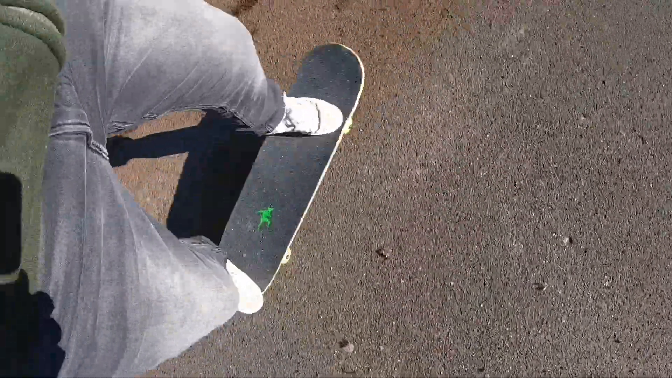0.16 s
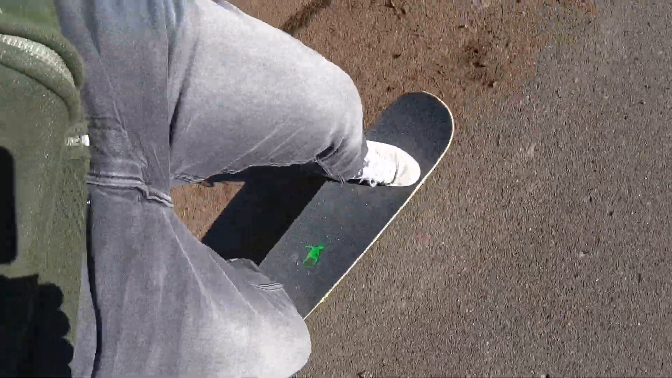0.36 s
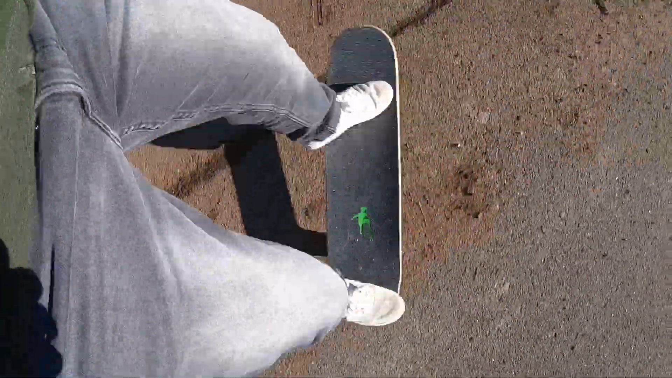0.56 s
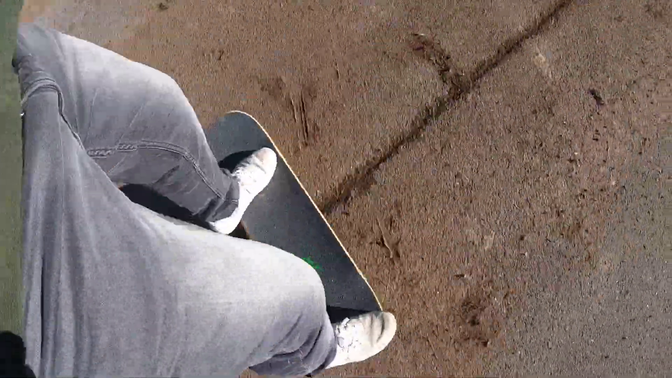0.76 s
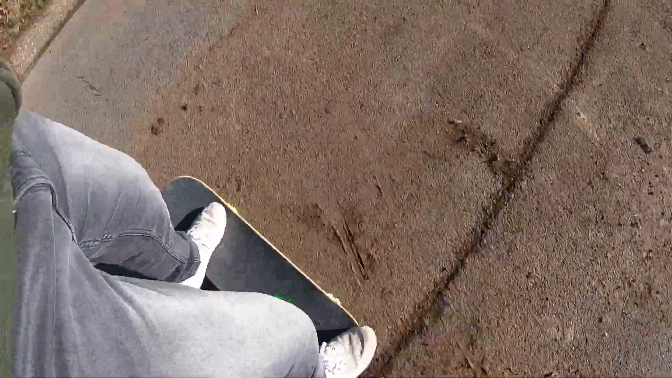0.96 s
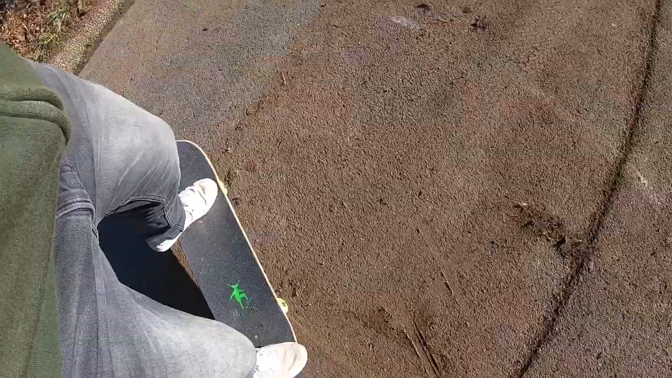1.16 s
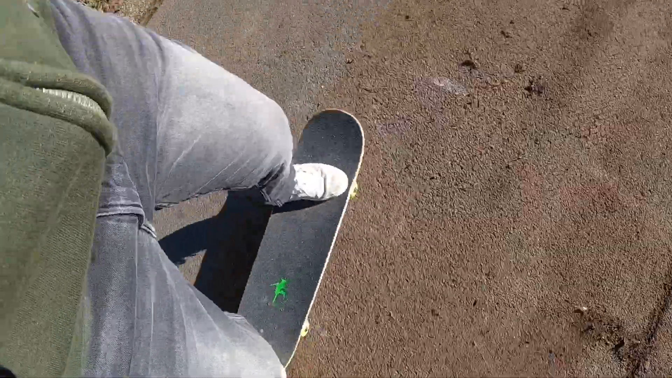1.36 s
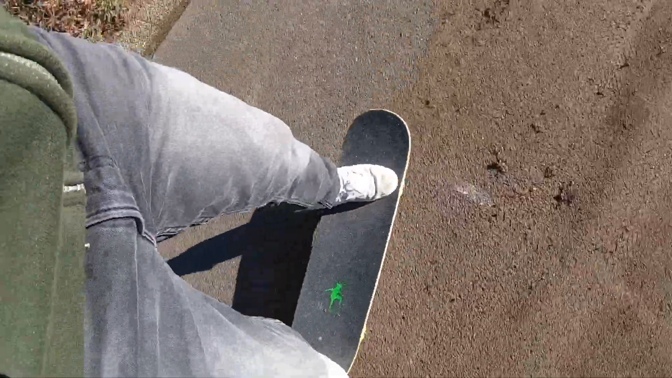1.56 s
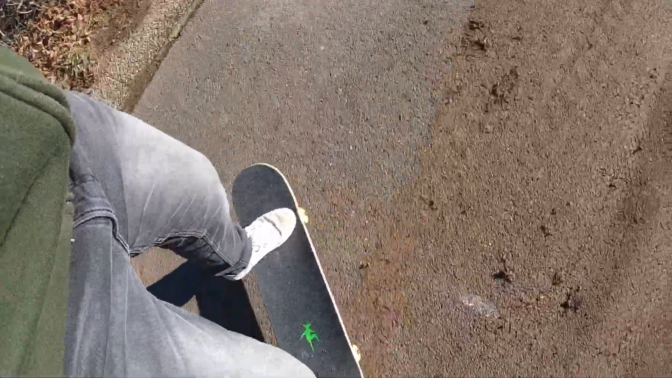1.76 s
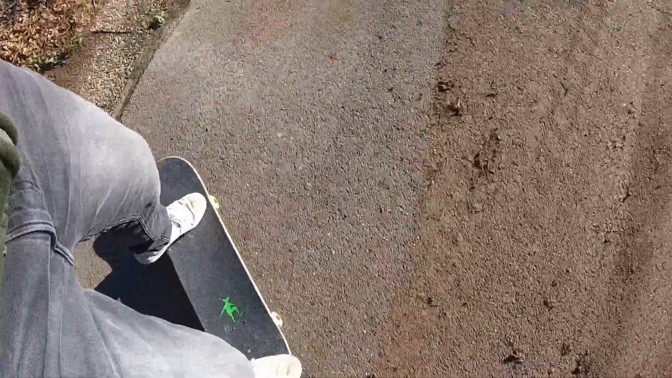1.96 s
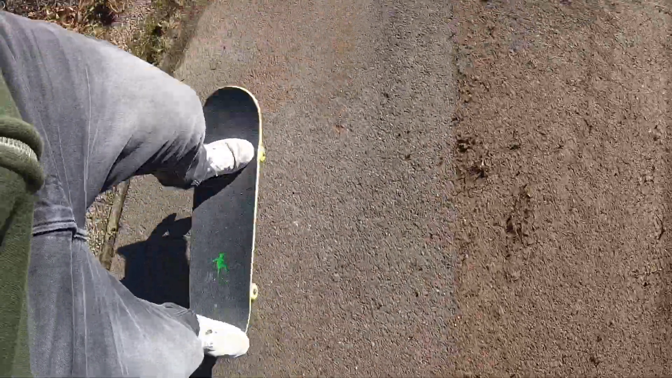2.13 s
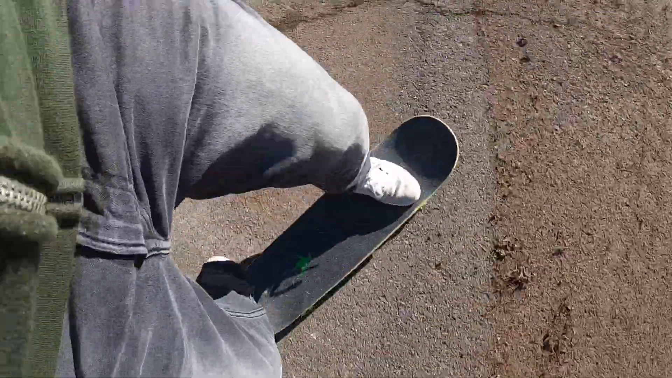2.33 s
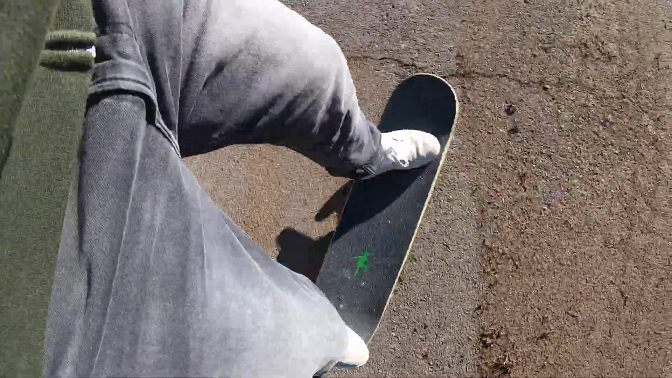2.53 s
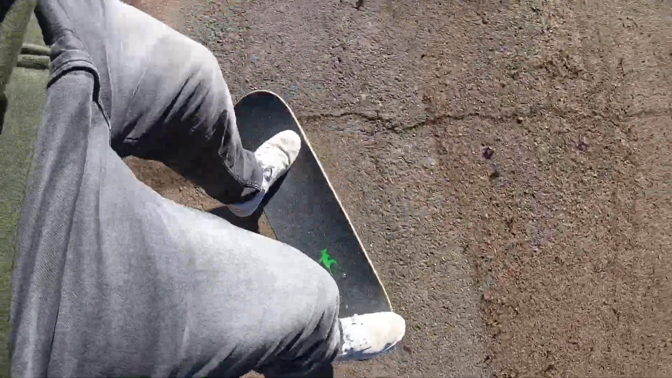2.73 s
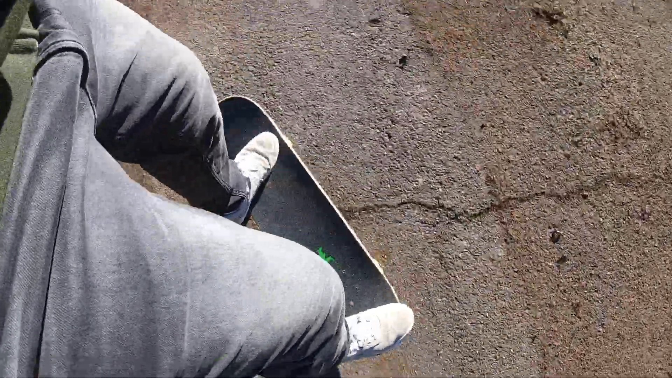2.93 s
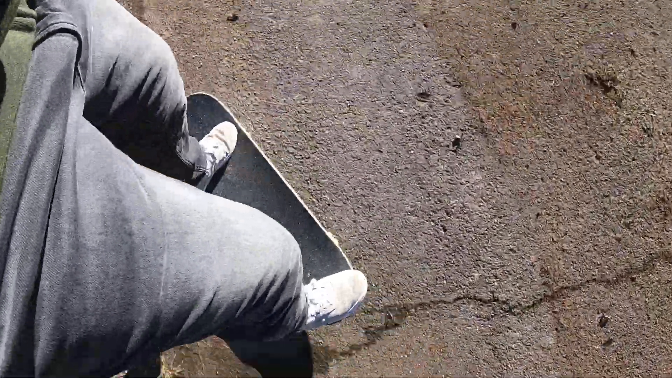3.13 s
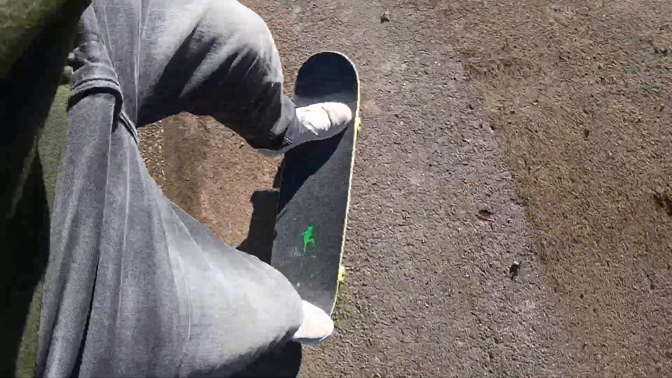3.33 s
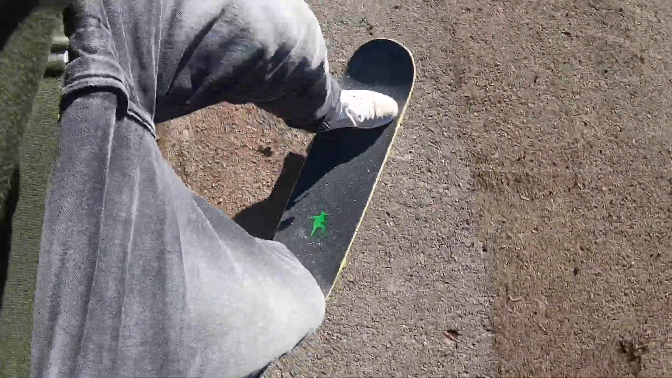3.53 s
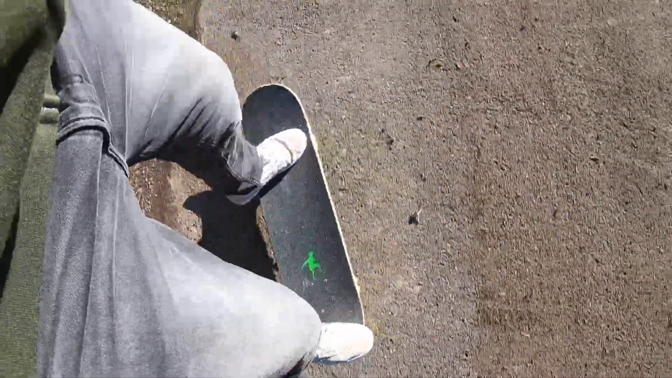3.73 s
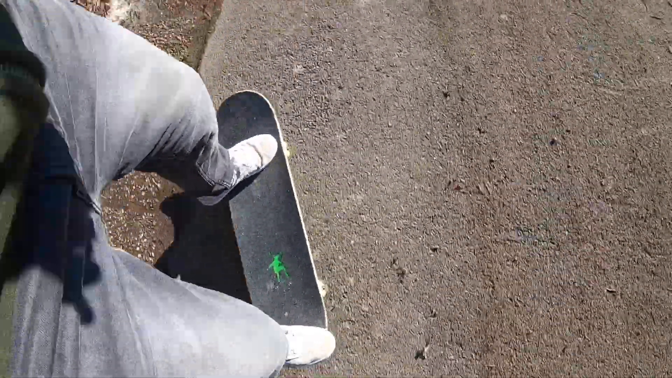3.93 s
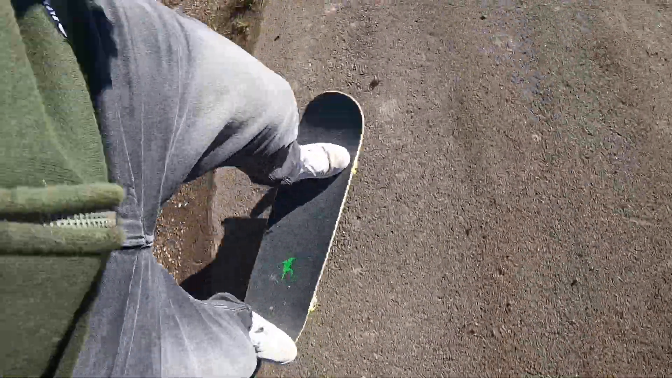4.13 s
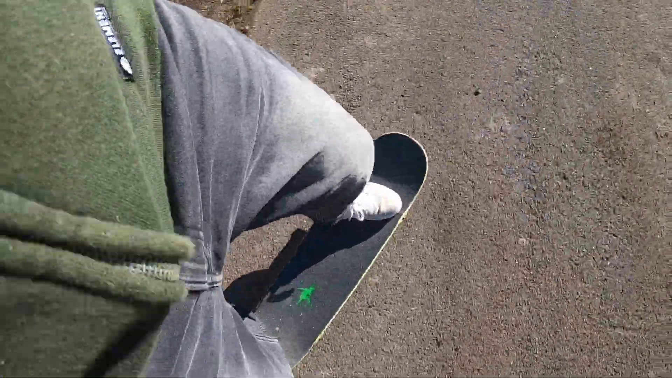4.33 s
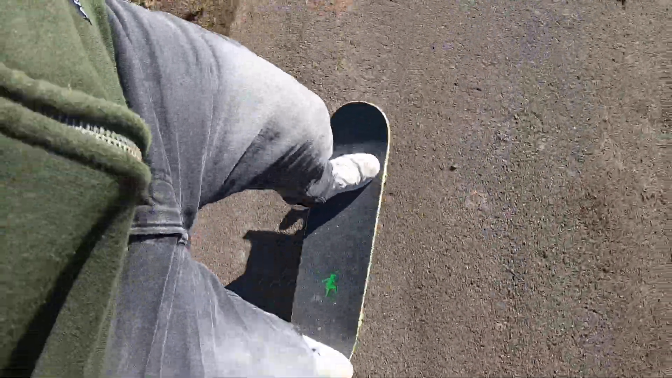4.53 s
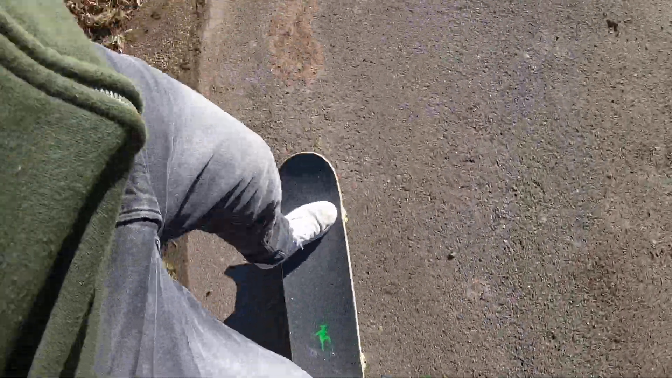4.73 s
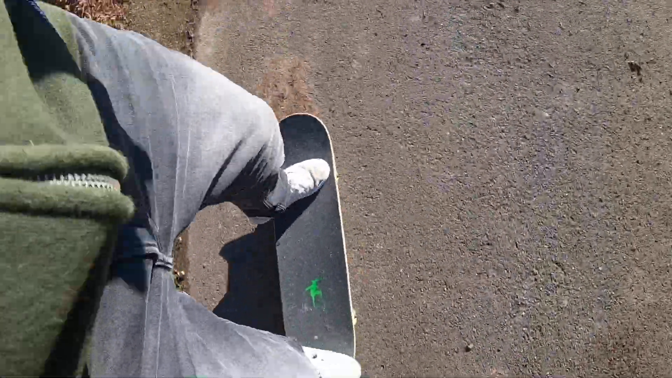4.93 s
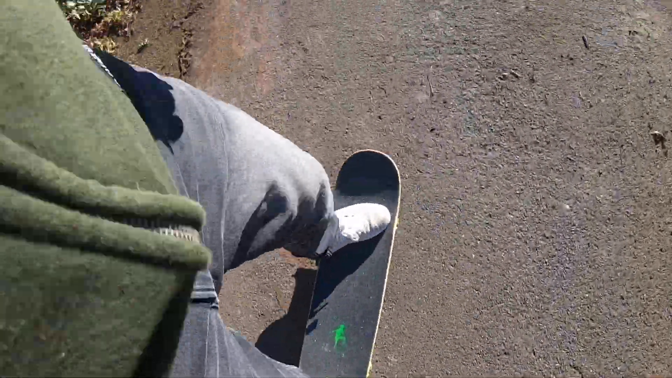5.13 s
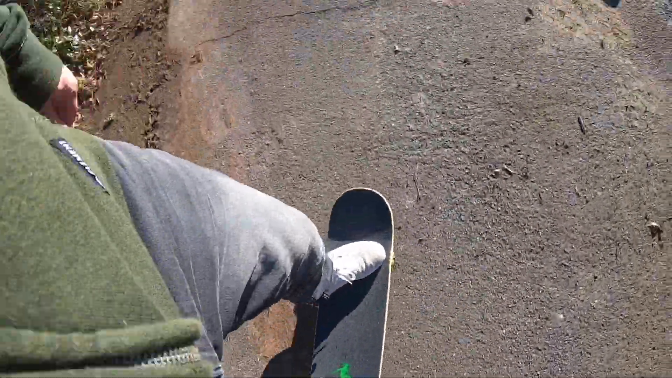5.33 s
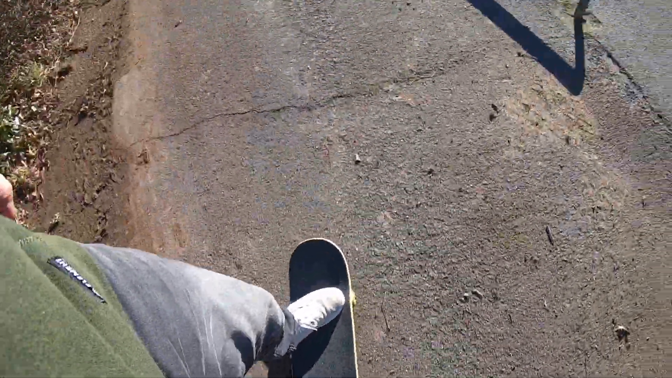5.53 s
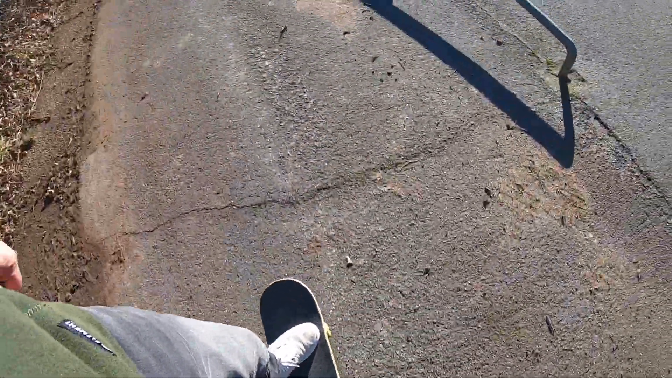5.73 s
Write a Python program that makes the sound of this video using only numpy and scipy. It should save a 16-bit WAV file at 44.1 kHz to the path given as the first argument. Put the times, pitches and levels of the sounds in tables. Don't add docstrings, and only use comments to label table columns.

```python
import sys
import numpy as np
from scipy import signal
from scipy.fft import rfft, irfft, next_fast_len
from scipy.io import wavfile
from scipy.ndimage import map_coordinates

SR = 44100
rng = np.random.default_rng(int(sys.argv[2]) if len(sys.argv) > 2 else 0)


def boost(x):
    u = np.asarray(x, float) / 20
    return 10 ** u


def master(y):
    cut = np.clip(np.atleast_2d(y).T, -1, 1)
    pcm = np.round(cut * 32767)
    wavfile.write(sys.argv[1], SR, pcm.astype(np.int16))


N = 254889


def unit(x):
    return x / np.sqrt(np.mean(x ** 2) + 1e-20)


def along(points, hz):
    point_hz, value = np.transpose(points)
    return np.interp(np.log(hz + 1), np.log(point_hz + 1), value)


def curves(rows):
    s, *columns = np.vstack(rows).T
    return [np.interp(np.arange(N) / SR, s, column) for column in columns]


def wobble(rate):
    knots = rng.standard_normal(int(N * rate / SR) + 4)
    return map_coordinates(knots, [np.arange(N) * rate / SR])


def filtered(x, response):
    m = next_fast_len(N + SR // 2)
    return irfft(rfft(x, m) * response(np.fft.rfftfreq(m, 1 / SR)), m)[..., :N]


def colour(spectrum):
    return lambda hz: boost(along(spectrum, hz))


def modes(table):
    def response(f):
        low, high = table[0][0] * 1.075, table[-1][0] * 2.4
        skirts = (1j * f / low) ** 2 / (1 + 1.4j * f / low - (f / low) ** 2)
        skirts = skirts / (1 + 1.4j * f / high - (f / high) ** 2)
        total = 0
        for k, (hz, width_hz, db) in enumerate(table):
            damping = 1j * f * width_hz
            total = total + (-1) ** k * boost(db) * damping / (hz * hz - f * f + damping)
        return skirts * total
    return response


def grit(per_s, spread_db, smooth):
    struck = rng.random(N) < per_s / SR
    stones = struck * boost(spread_db * rng.standard_normal(N)) * rng.standard_normal(N)
    crunch_s = 0.00076
    spread = signal.lfilter([1], [1, -np.exp(-1 / (crunch_s * SR))], abs(unit(stones)))
    return unit((smooth + unit(spread)) * rng.standard_normal(N))


# frequency in Hz, level in dB per Hz.
DISTANT_HUM = [(35, -32), (60, 2), (153, -26.5), (658, -20), (866, -17), (1600, -21), (3730, -42.5),
               (6160, -36), (14000, -71)]


def surroundings():
    a, b = filtered(rng.standard_normal((2, N)), colour(DISTANT_HUM))
    return boost(-48) * unit(np.array([a + .3 * b, a - .3 * b]))


# peak time in seconds, peak level in dB, length in seconds.
GUSTS = [(0, -27, 0.016), (.35, -28, 0.22), (1.506, -27.5, 0.21), (1.77, -42, 0.062), (2.66, -51, 1),
         (3.457, -48, 0.34), (3.93, -35.5, 0.2), (4.07, -42, .15), (4.477, -35.5, 0.23), (4.646, -39, 0.18),
         (5.305, -43, .2), (5.46, -29, 0.067)]
CALM_DB, GUST_FALL_DB, GUST_RISES = -62, 26.5, 1.56


def gusts_db():
    t = np.arange(N) / SR
    swells = []
    for s, db, length in GUSTS:
        away_s = np.maximum(t - s, GUST_RISES * (s - t))
        swells.append(db - GUST_FALL_DB * away_s / length)
    return np.maximum(np.max(swells, axis=0), CALM_DB)


# frequency in Hz, level in dB per Hz.
BUFFET = [(8.8, -34), (15, -4), (48, 0), (128, -7), (373, -27), (400, -29), (520, -59), (880, -120)]


def wind():
    lumps = boost(2.25 * np.array([wobble(18), wobble(4.8)]))
    gusts = unit(filtered(lumps * rng.standard_normal((2, N)), colour(BUFFET)))
    return boost(gusts_db() + 5.5) * gusts


# middle in seconds, length in seconds, pitch in Hz, width in Hz.
SCRUBS = [
    (1.819, .006, 2800, 400),
    (2.18, .09, 1930, 110),
    (3.2, .5, 100, 35),
    (3.569, .012, 3400, 250),
    (4.15, .18, 2700, 250),
    (4.659, .008, 2600, 300),
    (5.53, .22, 4050, 300),
    (5.53, .22, 6600, 900),
]
SCRUB_DB = [-39, -28, -29.5, -30.5, -38.5, -31, -48, -58]


def scrubs():
    t, out = np.arange(N) / SR, np.zeros(N)
    for (s, length, hz, width_hz), db in zip(SCRUBS, SCRUB_DB):
        edge = modes([(hz, 1.5 * width_hz, 0)])
        rub = unit(filtered(grit(300, spread_db=3, smooth=1.5), lambda f: edge(f) ** 2))
        out += boost(db) * rub * np.exp(-(2 * (t - s) / length) ** 2)
    return out


# weight on in seconds, held for in seconds, load in dB,
# load left at the landing in dB.
ROLLS = [(0, 0.13, -19, -33), (0.437, 0.2, -21.5, -24.5), (0.938, 0.56, -22, -23.5),
         (1.515, 0.057, -20, -31), (1.94, 0.32, -19.5, -31.5), (2.477, 0.2, -24, -38),
         (2.962, 0.22, -19, -26), (3.522, 0.06, -21.5, -28), (3.88, 0.19, -20.5, -26.5),
         (4.421, 0.08, -22, -41), (4.822, 0.18, -22, -29.5), (5.317, .28, -28.5, -30.5)]
# seconds after it, load in dB.
FLOATS = [(0.092, -33.5), (0.042, -34), (0.08, -45), (0.065, -44.5), (0.041, -36), (0.036, -57),
          (.063, -40.5), (0.11, -38), (0.086, -41), (0.065, -81), (0.069, -51)]
# stiffest pitch in Hz, bending as the weight comes on
# in dB, bending as it eases in dB.
STANCE = [(231, -0.5, 6.5), (243, 2.5, 0.5), (244, 0, 1), (215, 3, 2.5), (237, 0, 3.5), (214, -2.5, 1),
          (218, -0.5, 0.5), (197, -0.5, -1), (224, 0.5, 1.5), (209, 1.5, -0.5), (201, 1.5, -3.5),
          (185, -2, 1.5)]
LIFT_S, REBOUND_S, REBOUND_DB = 0.02, 0.018, -28.5
SETTLE = 0.47
SLACK_HZ, SLACK_S, STIFF_SHARE = 158.6, 0.049, 0.64
LIGHT_NOSE_DB, FLOATING_DB = -3.5, 1


def swing():
    load, flex = [], [(0, STANCE[0][0])]
    lands = [row[0] for row in LANDINGS] + [N / SR + LIFT_S]
    floats = [-.3] + [s + after for s, (after, _) in zip(lands, FLOATS)]
    for k, ((on, held, db, left_db), (hz, early_db, late_db)) in enumerate(zip(ROLLS, STANCE)):
        land = lands[k]
        lift = land - LIFT_S
        load += [(on, db, early_db), (min(on + held, lift), db, late_db)]
        load += [(lift, left_db, late_db + LIGHT_NOSE_DB)]
        stiffest = floats[k] + STIFF_SHARE * (land - floats[k])
        flex += [(max(stiffest, .01), hz), (land, hz)]
        if k < len(FLOATS):
            load += [(land + REBOUND_S, REBOUND_DB, 0), (floats[k + 1], FLOATS[k][1], FLOATING_DB)]
            flex += [(floats[k + 1] + SLACK_S, SLACK_HZ)]
    ramps, stance_db = curves([(s, boost(SETTLE * db), bend_db) for s, db, bend_db in load])
    return 20 * np.log10(ramps) / SETTLE, stance_db, curves(flex)[0]


# hardest moment in seconds, builds for in seconds,
# holds for in seconds, truck level in dB.
GRINDS = [(0.093, 0.23, 0.12, -25), (.5, 0.084, 0.055, -30), (0.652, .03, 0.026, -30),
          (0.808, .03, 0.018, -42), (0.937, .05, 0.012, -48), (1.291, 0.29, 0.07, -25.5),
          (1.406, 0.023, 0.0046, -34.5), (1.605, 0.038, 0.013, -29), (1.874, 0.033, 0.018, -33.5),
          (2.101, 0.14, .2, -25), (2.502, 0.018, 0.16, -33.5), (2.95, 0.078, 0.011, -30),
          (3.288, 0.24, 0.093, -29.5), (3.572, 0.043, 0.075, -37), (3.875, 0.055, 0.023, -35),
          (4.039, 0.11, 0.16, -29), (4.498, 0.044, 0.043, -35.5), (5.006, 0.1, .02, -31),
          (5.09, 0.045, .02, -35), (5.584, 0.17, 0.016, -41)]
GRIND_RISE_DB, GRIND_FALL_DB_PER_S = 11.5, 258
RATTLE_DB, RATTLE_T60_S = -20, 0.11
BEND_DB, BEND_FOLLOWS = -22.5, 0.69
TRUCK_DB, TRUCK_FOLLOWS = -41, 0.48
HISS_DB, HISS_FOLLOWS = -47, 0.74


def levels(load_db, stance_db):
    t = np.arange(N) / SR
    shake = boost(TRUCK_DB + TRUCK_FOLLOWS * (load_db + 18.5)) ** 2
    for s, builds, holds, db in GRINDS:
        ramp_db = np.minimum(GRIND_RISE_DB * (t - s) / builds, GRIND_FALL_DB_PER_S * (s + holds - t))
        shake += boost(db + np.minimum(ramp_db, 0)) ** 2
    for s, db, *_ in LANDINGS:
        shake += boost(db + RATTLE_DB - 60 * abs(t - s) / RATTLE_T60_S) ** 2 * (t > s)
    bend_db = BEND_DB + BEND_FOLLOWS * (load_db + 21) + stance_db
    plate_db = load_db
    truck_db = 10 * np.log10(shake)
    return bend_db, plate_db, truck_db, HISS_DB + HISS_FOLLOWS * (truck_db + 29)


def gliding(force, hz, width_hz):
    turn = np.exp(2j * np.pi * np.cumsum(hz) / SR)
    keep = np.exp(-np.pi * width_hz / SR)
    return (signal.lfilter([1], [1, -2 * keep, keep ** 2], force / turn) * turn).real


def restless(force, level_db, table, drift_db):
    out = 0
    for k, (hz, width_hz, db) in enumerate(table):
        push = force * boost(level_db + drift_db * wobble(12))
        out = out + (-1) ** k * filtered(push, modes([(hz, width_hz, db)]))
    return out / np.std(filtered(force, modes(table)))


# pitch in Hz, width in Hz, level in dB.
BENDING = [(124.4, 42, -7), (180.5, 68, -2.5), (327.5, 38.5, -0.5)]
# pitch in Hz, width in Hz, level in dB.
PLATE = [(410, 440, -19.5), (529.8, 44.6, 1.5), (641, 75.3, -4), (737.7, 42, -2), (797, 92, -12.5)]
# pitch in Hz, width in Hz, level in dB.
TRUCKS = [(971, 280, -5), (1225, 286, 2), (1498, 238, 2), (1666, 181, 1), (2012, 270, -3.5),
          (2283, 286, -4.5), (2650, 294, -8), (3270, 686, -14.5), (4000, 1120, -23)]
# frequency in Hz, level in dB per Hz.
HISS = [(1940, -16), (3300, 0.5), (4090, -10), (4450, -7.5), (5300, -11.5), (7090, -8), (8120, -24.5),
        (9130, -12), (9740, -13.5), (10300, -18.5), (11600, -35), (14100, -37), (15500, -45)]


def rolling():
    road = grit(700, spread_db=5.5, smooth=1.66)
    force = road * boost(0.81 * wobble(18) + 1.04 * wobble(50))
    load_db, stance_db, flex_hz = swing()
    bend_db, plate_db, truck_db, hiss_db = levels(load_db, stance_db)
    bending = gliding(force * boost(bend_db), flex_hz, width_hz=72.1)
    bending /= np.std(gliding(force, flex_hz, width_hz=66))
    deck = restless(force, bend_db - 6, BENDING, drift_db=2.5)
    deck += restless(force, plate_db, PLATE, drift_db=1.5)
    trucks = restless(force, truck_db, TRUCKS, drift_db=2.2)
    dust = force * np.sign(rng.standard_normal(N))
    hiss = filtered(dust * boost(hiss_db + wobble(30)), colour(HISS))
    hiss /= np.std(filtered(force, colour(HISS)))
    air = filtered(hiss, lambda hz: hz > 11000)
    hiss += air * (boost(np.minimum(.6 * (hiss_db + 44), 0)) - 1)
    return bending + deck + trucks + hiss


# pitch in Hz, width in Hz, level in dB.
THUD = [(150, 45, -7), (188, 24, 0), (325, 50, -9)]
# pitch in Hz, width in Hz, level in dB.
KNOCK = [(500, 70, -6), (620, 90, -7), (722, 40, 0), (790, 60, -7)]
# time in seconds, truck peak in dB, then in dB over that peak
LANDINGS = [(0.2514, -8.5, -7.5, -2.5, -14), (0.726, -8, -4.5, -6, -16), (1.3852, -7.5, -23, -6, -9.5),
            (1.745, -4.5, -11, -4, -27), (2.3698, -5, -13.5, -11, -14), (2.7246, -8.5, -7, 0, -23),
            (3.4175, -5.5, -20, -13.5, -12), (3.7298, -5, -12, -6.5, -17.5), (4.2509, -7, -15, -7.5, -8.5),
            (4.6487, -7.5, -3, 3.5, -18.5), (5.1282, -6.5, -22, -10.5, -15)]
# time in seconds, truck peak in dB, then in dB over it
BOUNCES = [(0.2282, -21, -3, -15), (0.261, -10, -21, -13), (0.2933, -15, -3, -31), (0.787, -24, -7, -24),
           (.8215, -27, 0, -14), (1.5234, -39, 18, -32), (1.9605, -31, 14, -30), (2.8601, -29, 9, -25),
           (4.188, -15, -5, -16), (1.759, -7.5, -11.5, -18), (1.8414, -24.5, -8, -12),
           (1.875, -32.5, 9, -18), (2.3985, -12.5, -7, -35.5), (2.805, -27.5, 0, -36),
           (3.5182, -38, 11, -35), (3.7455, -8.5, -10.5, -40), (3.761, -12, -0.5, -15),
           (3.872, -25, 6, -40), (4.2929, -22, 6, -24), (4.3932, -34, 10, -34), (4.758, -24.5, -16, -29),
           (5.158, -24.5, -2, -27)]
# time in seconds, truck peak in dB, then
# in dB over it # the deck and the hiss.
MORE_BOUNCES = [(.2036, -12, -20, -9.5), (0.4693, -17.5, 7, -17), (0.4831, -13, -19, -33),
                (.5154, -13.5, -5, -18), (0.947, -11, -3, -16), (1.0864, -18, -3, -40), (1.5936, -13, -6, -18),
                (2.4983, -22.5, 7, -11), (2.6101, -21.5, -4, -37), (2.9273, -23.5, -9, -18),
                (3.1307, -18.5, 0.5, -20), (3.1817, -17.5, -11, -13), (3.2885, -21, -5.5, -10),
                (3.5603, -19, -9, -33), (3.5712, -17.5, 0, -9), (3.6121, -12.5, -13, -25),
                (3.6478, -20, -16, -42), (4.0383, -15, 4.5, -41), (4.1187, -21, -4, -21), (4.4853, -10, -13, -16),
                (4.9942, -12, -4, -21), (5.0896, -21, -8, -21), (5.3122, -25, 0, -17), (5.4838, -26, 3, -38),
                (5.5991, -23.5, -10, -8), (5.6157, -25, -11, -15), (5.7241, -29.5, 11.5, -15)]
THUD_UNDER_KNOCK_DB, SIDE_SCATTER_DB = -4, 1.2


def slaps():
    early, t = 200, np.arange(SR // 8) / SR
    click = np.eye(1, N, early)[0]
    body = [modes(THUD), modes(KNOCK), modes(TRUCKS), colour(HISS)]
    rings = np.array([filtered(click, part)[:len(t)] for part in body])
    crunch = boost(-60 * t / np.array([[.01], [.008], [.022], [.022]]))
    blow = np.array([[5], [4], [2.5], [1.5]]) * boost(-60 * t / np.array([[.006], [.0012], [.0008], [.0008]]))
    trim_db = np.array([[-.5], [-.5], [-1.5], [-1.5]])
    out = np.zeros((2, N + 2 * len(t)))
    small = [(s, db, deck_db + THUD_UNDER_KNOCK_DB, deck_db, hiss_db)
             for s, db, deck_db, hiss_db in BOUNCES + MORE_BOUNCES]
    for s, db, thud_db, knock_db, hiss_db in LANDINGS + small:
        pan_db = SIDE_SCATTER_DB * rng.standard_normal()
        push = rng.standard_normal(len(t)) * crunch - blow
        parts = signal.fftconvolve(push, rings, axes=1)[:, :len(t)]
        part_db = db + trim_db + np.array([[thud_db], [knock_db], [0], [hiss_db]])
        parts *= boost(part_db) / abs(parts).max(1, keepdims=True)
        start = round(s * SR)
        out[:, start:start + len(t)] += boost(pan_db / 2 * np.array([[1], [-1]])) * parts.sum(0)
    return out[:, early:N + early]


# frequency in Hz, left over right in dB.
TILT = [(60, -1.0), (92, -1.0), (140, -0.5), (210, 0.0), (330, 0.0), (500, -0.5), (770, 0.5), (1170, 0.5),
        (1790, 2.0), (2740, 0.0), (4190, 0.0), (6410, 1.0), (9810, -4.0), (15000, -1.5)]
# frequency in Hz, level in dB.
SCATTER = [(60, -28), (200, -41.5), (380, -22.5), (700, -11.5), (1200, -7.5), (1800, -11), (2700, -12),
           (4200, -16), (6400, -7), (9800, 3), (15000, -9)]


def ports(x):
    sign = np.array([[1], [-1]])
    x = filtered(x, lambda hz: (1j * hz / 95) ** 2 / (1 + 1.4j * hz / 95 - (hz / 95) ** 2))
    direct = filtered(x, lambda hz: boost(sign * along(TILT, hz) / 2))
    t = np.arange(SR // 20) / SR
    tail = rng.standard_normal(len(t)) * boost(-60 * t / .03)
    scattered = signal.fftconvolve(x.mean(0), tail / np.linalg.norm(tail))[:N]
    scattered *= np.cos(np.cumsum(wobble(6)) * 60 / SR)
    return direct + sign * boost(3.0) * filtered(scattered, colour(SCATTER))


def scene():
    board = rolling() + slaps() + scrubs()
    return ports(board) + wind() + surroundings()


def low_pass(x):
    return signal.sosfilt(signal.butter(12, 15680, fs=SR, output="sos"), x)


def record(dry):
    held = dry / (1 + abs(dry / .85) ** 4) ** (1 / 4)
    left_s = (N - np.arange(N)) / SR
    held = held * np.minimum(left_s / .004, 1)
    return low_pass(filtered(held, lambda hz: hz < 15700))


dry = scene()
out = record(dry)
master(out)
```